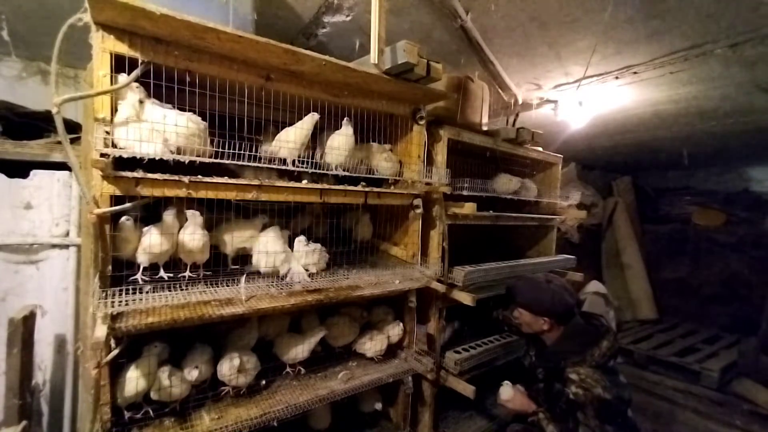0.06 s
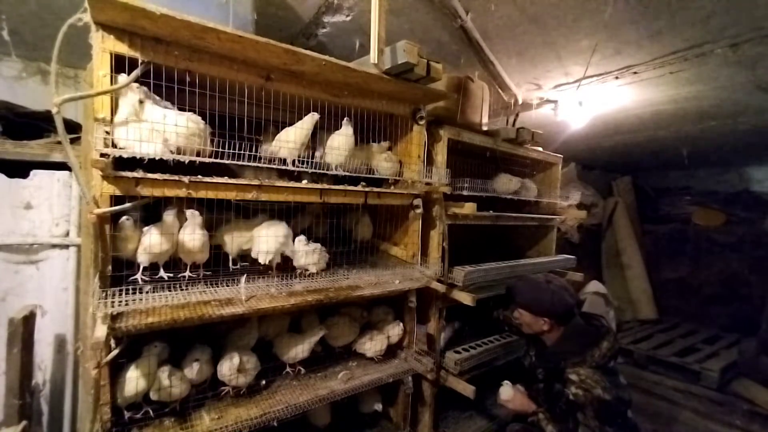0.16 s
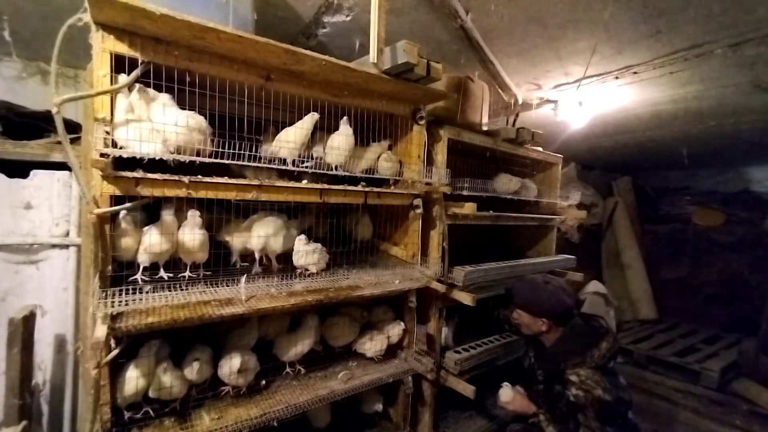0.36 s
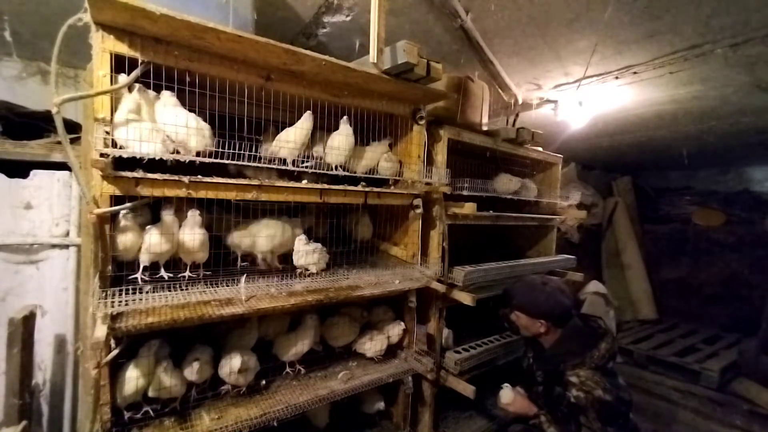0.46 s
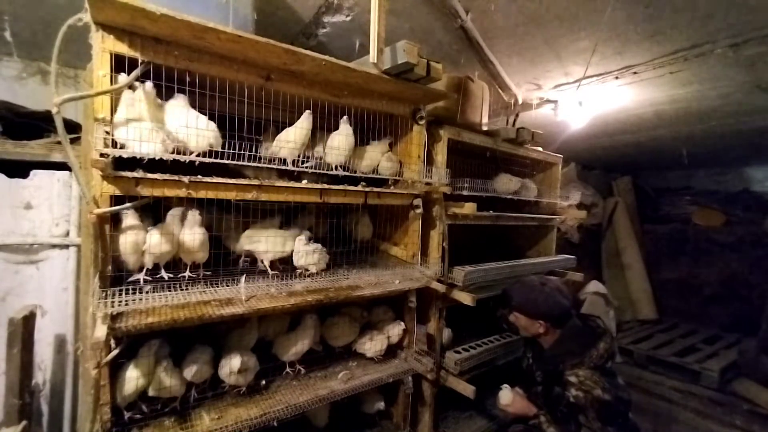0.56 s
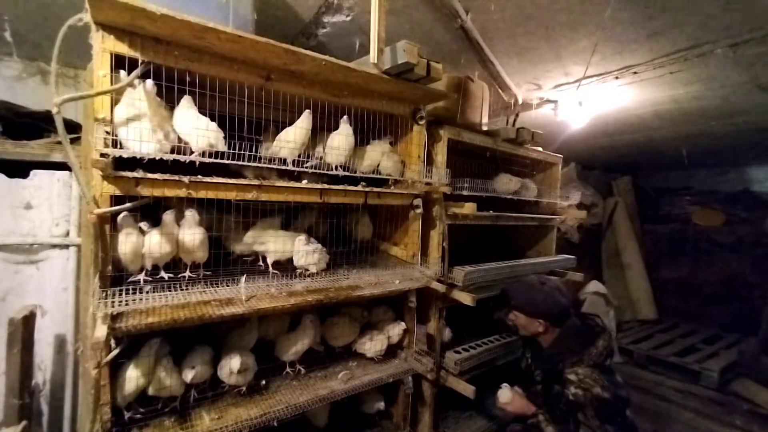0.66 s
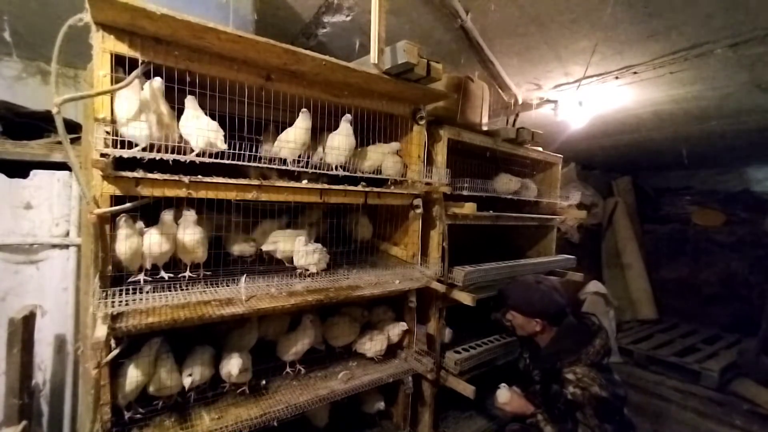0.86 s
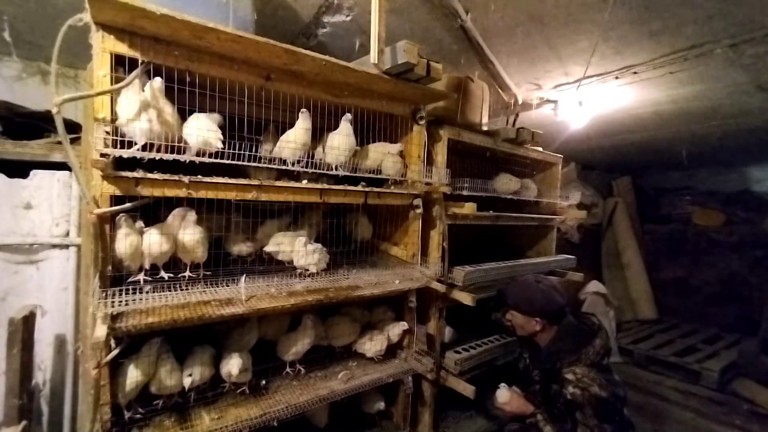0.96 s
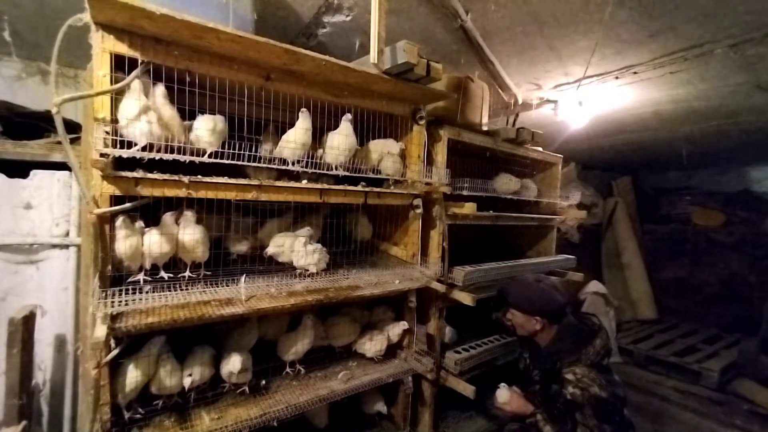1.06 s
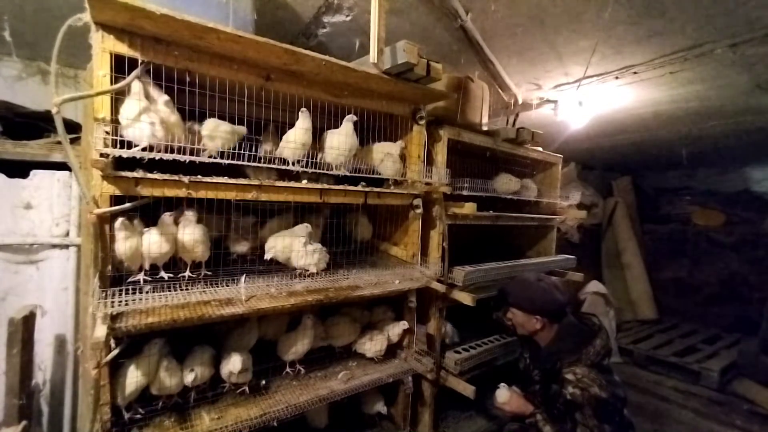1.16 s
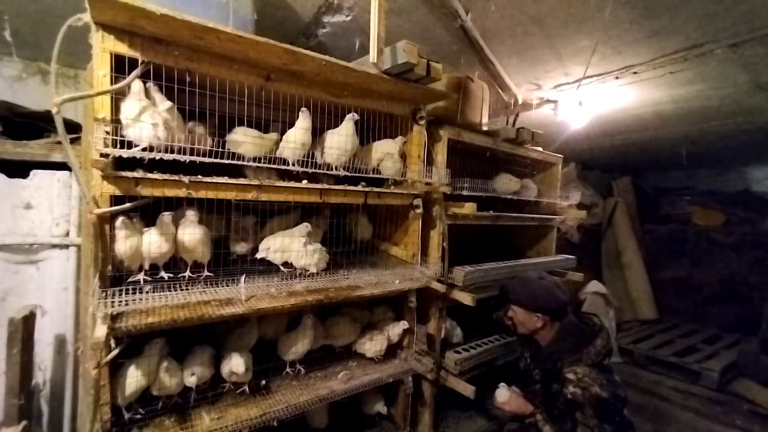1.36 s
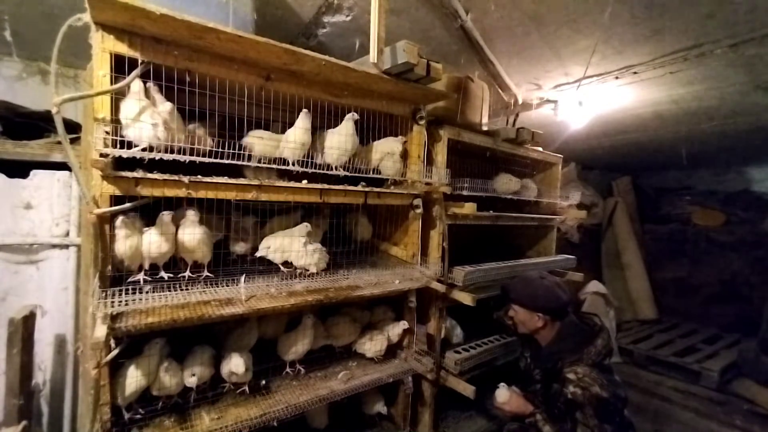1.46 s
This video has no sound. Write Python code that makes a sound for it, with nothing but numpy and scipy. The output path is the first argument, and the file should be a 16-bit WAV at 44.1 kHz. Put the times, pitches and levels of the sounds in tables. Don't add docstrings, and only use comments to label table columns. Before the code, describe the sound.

One close quail gives two brief whistled notes, then a loud rapid trill of rising, cracking chirps that tires into a falling rasp; soft cage scuffs and fan wash in a small hard shed.

```python
import sys
import numpy as np
from scipy import signal
from scipy.fft import rfft, irfft
from scipy.io import wavfile
from scipy.ndimage import uniform_filter1d

SR = 44100
rng = np.random.default_rng(int(sys.argv[2]) if len(sys.argv) > 2 else 0)


def bounce(signal):
    frames = np.transpose(np.atleast_2d(signal))
    limited = np.clip(frames, -1, 1)
    pcm = np.round(limited * 32767).astype(np.int16)
    wavfile.write(sys.argv[1], SR, pcm)


def magnitude_from_level(level_db):
    exponent = np.asarray(level_db, float) / 20
    return 10 ** exponent


N = 66150

# (frequency [Hz], level [dB per Hz])
FAN_WASH = [(30, -40), (70, -36), (130, -1), (400, 2.5), (800, 4.5), (1600, 0.5), (5000, -15),
            (12000, -17.5)]
# (frequency [Hz], left-right likeness [0-1])
WASH_LIKENESS = [(60, 0.75), (150, 0.89), (400, 0.86), (1000, 0.57), (4000, 0.1), (12000, 0.1)]
# (time [s], level [dB], length [s], centre [Hz], width [Hz])
SCUFFS = [(0, -39.5, 0.076, 249, 398), (0.017, -43, 0.02, 11900, 6000), (0.187, -34, 0.099, 534, 920),
          (0.417, -36.5, 0.31, 378, 650), (0.988, -35, 0.15, 162, 96), (0.962, -31.5, 0.079, 310, 425),
          (1.112, -36.5, 0.073, 327, 480), (1.242, -39, 0.08, 280, 463), (1.378, -38.5, 0.018, 9000, 10300),
          (1.367, -50, 0.12, 770, 505), (1.444, -33, .09, 630, 850), (1.452, -36.5, 0.048, 2310, 2660),
          (1.459, -40, 0.068, 11100, 6500)]
# (time [s], level [dB])
BREATH = [(0.17, -55), (0.208, -37.5), (0.322, -45.5), (0.35, -30), (0.4, -53), (0.458, -64.5),
          (0.516, -29.5), (0.604, -30), (0.624, -23.5), (0.77, -20.5), (0.8, -24.5), (0.878, -20.5),
          (0.932, -21.5), (0.982, -34.5), (1.214, -54), (1.226, -46), (1.306, -56), (1.31, -46)]
# (frequency [Hz], level [dB per Hz])
BREATH_COLOUR = [(2500, -28), (4300, 2), (5000, -1), (6200, -2.5), (8000, -7), (10500, 0), (13000, -3.5),
                 (15600, -9.5)]
# (time [s], length [s], level [dB], start pitch [Hz], end pitch [Hz])
CROW_NOTES = [(.185, .04, -15.5, 1506, 1640), (0.207, 0.023, -27, 1578, 1580),
              (0.317, 0.037, -15, 1250, 2332), (0.345, 0.035, -20.5, 1500, 1008),
              (0.349, 0.029, -27, 2160, 1890), (0.339, 0.021, -21, 2865, 3930),
              (0.49, 0.05, -11.5, 1500, 3300), (0.543, 0.035, -7, 1494, 3550),
              (0.584, 0.052, -7, 1537, 3953), (0.634, 0.046, -6.5, 1598, 4183),
              (0.683, .04, -4.5, 1663, 3957), (0.731, 0.042, -5, 1700, 3504),
              (0.779, 0.036, -3, 1987, 2926), (0.805, 0.041, -18, 1548, 2486),
              (0.848, 0.04, -11, 1609, 2420), (0.886, 0.01, -22, 1583, 1770),
              (0.922, 0.036, -12.5, 1590, 2090), (0.978, .035, -18.5, 1590, 1776),
              (1.031, 0.044, -27, 1530, 1880), (1.061, 0.031, -27.5, 1316, 1174),
              (1.048, .025, -24, 2220, 2530)]
# (frequency [Hz], gain [dB])
THROAT = [(800, -1.5), (1200, 2.5), (1900, 1.5), (2500, -4.5), (3300, -4.5), (4200, -3), (5000, -14),
          (8000, -27)]
# (time [s], level [dB], centre [Hz])
RASP = [
    (0.801, -24, 3670),
    (0.848, -17, 3470),
    (0.889, -15.5, 3220),
    (0.936, -11.5, 2850),
    (0.981, -20.5, 2220),
    (1.062, -25, 2176),
    (1.11, -38, 2500),
    (1.138, -29.5, 2410),
    (1.189, -37.5, 2080),
    (1.215, -64, 2110),
]
# (frequency [Hz], gain [dB])
BILL = [(500, 5.5), (1000, 0.5), (4100, 3), (4700, -4), (8000, -23)]
# (delay [s], left level [dB], right level [dB])
BOARDS = [
    (.0031, -15.5, -15),
    (.0057, -20.5, -14),
    (.0092, -17, -15),
    (0.0137, -13, -11.5),
    (0.0201, -15, -9.5),
]
# (frequency [Hz], fall by 60 dB [s])
SHED_DECAY = [(300, .25), (1500, .15), (3000, .16), (8000, .12)]
# (frequency [Hz], gain [dB])
GATE_DEPTH = [(2800, 0), (4600, -20), (15000, -20)]

LAG_S = 9e-5


def evened(x):
    return x / np.sqrt(np.mean(x ** 2) + 1e-20)


def read(points, hz):
    f, value = np.transpose(points)
    return np.interp(np.log(hz + 1), np.log(f + 1), value)


def add(mix, s, sound):
    part = mix[..., round(max(s, 0) * SR):][..., :sound.shape[-1]]
    part += sound[..., :part.shape[-1]]


def colour(x, points, lag_s=0.):
    hz = np.fft.rfftfreq(N, 1 / SR)
    delay = np.exp(-2j * np.pi * hz * lag_s)
    return irfft(rfft(x) * magnitude_from_level(read(points, hz)) * delay, N)


def resonate(x, hz, width_hz):
    turn = np.exp(2j * np.pi * np.cumsum(hz * np.ones(x.shape[-1])) / SR)
    r = np.exp(-np.pi * width_hz / SR)
    return 2 * (turn * signal.lfilter([1 - r], [1, -r], x / turn)).real


def ring(x, hz, width_hz):
    return evened(resonate(resonate(x, hz, width_hz), hz, width_hz))


def drift(rate_hz):
    size = max(round(SR / rate_hz / 2), 2)
    return evened(uniform_filter1d(uniform_filter1d(rng.standard_normal(N), size), size))


def fan_and_flock():
    frames, hz = N // 256 + 5, np.fft.rfftfreq(1024, 1 / SR)
    a, b, c, d, patches = rng.standard_normal((frames, 513, 5)).T
    patches = evened(uniform_filter1d(uniform_filter1d(patches, 14, 0), 9, 1))
    same = np.clip(read(WASH_LIKENESS, hz), -1, 1)[:, None]
    left = a + 1j * b
    right = same * left + np.sqrt(1 - same ** 2) * (c + 1j * d)
    z = np.array([left, right]) * magnitude_from_level(read(FAN_WASH, hz)[:, None] + 2.2 * patches)
    wash = evened(signal.istft(z, nperseg=1024, noverlap=768)[1][:, :N])
    hum_hz = 136 * (1 + .012 * drift(6))
    hum = np.sin(2 * np.pi * np.cumsum(hum_hz) / SR) * magnitude_from_level(-48.5 + 5.2 * drift(4.5))
    return magnitude_from_level(-37.5) * wash + hum


def scuffs():
    out = np.zeros(N)
    grit = rng.standard_normal(N) * magnitude_from_level(3 * drift(300))
    for start, db, length, hz, width_hz in SCUFFS:
        rub = grit[round(max(start, 0) * SR):][:round(length * SR)]
        u = np.linspace(0, 1, len(rub))
        stroke = np.sin(np.pi * u ** 0.36)
        add(out, start, magnitude_from_level(db) * stroke * ring(rub, hz, width_hz))
    return out


def breath():
    s, db = np.transpose(BREATH)
    shared, own = rng.standard_normal((N, 2)).T
    left = colour(shared, BREATH_COLOUR)
    right = colour(shared + .9 * own, BREATH_COLOUR, LAG_S) * .7
    effort_db = np.interp(np.arange(N) / SR, s, db, -120, -120)
    return magnitude_from_level(effort_db + 1.1 * drift(50) - 1) * evened(np.array([left, right]))


def crow():
    bend, swell, stop_s = 2.6, 1.35, .008
    tire_s, tire_db_per_s = .78, 55
    out, hiss = np.zeros(N), rng.standard_normal(N)
    wobble, flutter = drift(350), drift(130)
    for start, length, effort_db, low_hz, top_hz in CROW_NOTES:
        t = np.arange(0, length, 1 / SR)
        at = np.minimum(round(start * SR) + np.arange(len(t)), N - 1)
        hz = low_hz + (top_hz - low_hz) * (t / length) ** bend
        turn = 2 * np.pi * np.cumsum(hz * (1 + .015 * wobble[at])) / SR
        tone = np.sin(turn) + magnitude_from_level(-20) * np.sin(2 * turn)
        hoarse_db = -13 + tire_db_per_s * max(start - tire_s, 0)
        hoarse = magnitude_from_level(hoarse_db) * ring(hiss[at], hz, 500)
        climb_khz = abs(hz - low_hz) / 1000
        crack = magnitude_from_level(-2.5) * climb_khz * ring(hiss[at], hz, 1700)
        rise = np.sin(np.pi / 2 * np.minimum(swell * t / length, 1)) ** 1.5
        shape = rise * np.minimum((length - t) / stop_s, 1)
        voice = evened(tone) + hoarse + crack
        add(out, start, magnitude_from_level(effort_db) * shape * (1 + .2 * flutter[at]) * voice)
    return colour(out, THROAT)


def rasp():
    puffs_per_s, depth = 105, 0.86
    t = np.arange(N) / SR
    s, db, hz = np.transpose(RASP)
    turns = np.cumsum(puffs_per_s * (1 + 0.23 * drift(40))) / SR
    puff_shape = 1 - depth + depth * np.exp(-(turns % 1) / 0.41)
    puffs = puff_shape * rng.standard_normal(N)
    throat = ring(puffs, np.interp(t, s, hz), 960)
    chest = magnitude_from_level(-11.5) * ring(puffs, 1500, 640)
    return magnitude_from_level(np.interp(t, s, db, -120, -120)) * colour(throat + chest, BILL)


def shed(x):
    size = SR // 2
    taps = np.zeros((2, size))
    at = np.arange(120, size - 20, 20)[:, None] + rng.integers(0, 20, ((size - 121) // 20, 2))
    np.put_along_axis(taps, at.T, rng.choice([-1., 1.], at.T.shape), 1)
    hz, t, z = signal.stft(taps, SR, nperseg=128)
    fading = z * magnitude_from_level(-60 * t / read(SHED_DECAY, hz)[:, None])
    tail = signal.istft(fading, SR, nperseg=128)[1]
    tail = tail + 0.19 * tail[::-1]
    return signal.fftconvolve(x[None], tail / np.linalg.norm(tail[0]), axes=1)[:, :N]


def gate(x):
    hz, _, z = signal.stft(x, SR, nperseg=1024, noverlap=768)
    power = (abs(z) ** 2).sum(0)
    power = uniform_filter1d(uniform_filter1d(power, size=5, axis=0), size=7, axis=1)
    under_db = -1.05
    weak = power < magnitude_from_level(2 * under_db) * uniform_filter1d(power, size=19, axis=0)
    shut_db = uniform_filter1d(weak * read(GATE_DEPTH, hz)[:, None], size=3, axis=1)
    return signal.istft(z * magnitude_from_level(shut_db), SR, nperseg=1024, noverlap=768)[1][:, :N]


def scene():
    background = fan_and_flock()
    rubs, hiss = scuffs(), breath()
    near = rubs + crow() + rasp()
    left = colour(near, [(100, 0.11), (9000, .6)])
    right = colour(near, [(100, 0.08), (9000, 0.052)], LAG_S)
    out = np.array([left, right])
    for s, left_db, right_db in BOARDS:
        add(out, s, magnitude_from_level(np.array([[left_db], [right_db]])) * near)
    back = shed(near + hiss[0])
    mid = back.mean(0)
    side = colour(back[0] - back[1], [(150, -26), (700, -1)])
    reverb = magnitude_from_level(1.5) * np.array([mid + side, mid - side])
    return magnitude_from_level(-2.0) * (out + hiss + reverb) + background


def low_pass(x):
    return signal.sosfilt(signal.butter(12, 15620, fs=SR, output="sos"), x)


def record(dry):
    limit_db, recover_db_per_s, squeeze = -11.5, 121, 0.41
    thin = signal.sosfilt(signal.butter(2, 94, "high", fs=SR, output="sos"), dry)
    power_db = 10 * np.log10(abs(uniform_filter1d((thin ** 2).mean(0), size=250)) + 1e-12)
    fall = np.arange(N) * recover_db_per_s / SR
    held_db = np.maximum.accumulate(power_db + fall) - fall
    over_db = np.maximum(held_db - limit_db, 0)
    ducked = thin * magnitude_from_level(1.5 - squeeze * uniform_filter1d(over_db, size=150))
    ceiling = 1.2
    soft = ceiling * ducked / (ceiling ** 4 + ducked ** 4) ** .25
    edge = signal.firwin(511, 15650, window=("kaiser", 9), fs=SR)
    mix = signal.oaconvolve(gate(soft), edge[None], "same")
    return low_pass(mix)


dry = scene()
out = record(dry)
bounce(out)
```